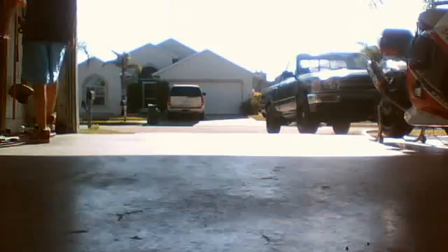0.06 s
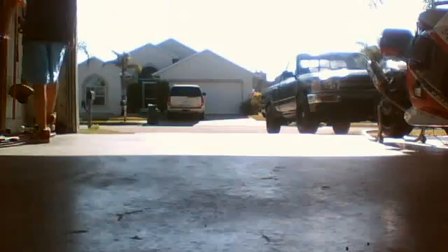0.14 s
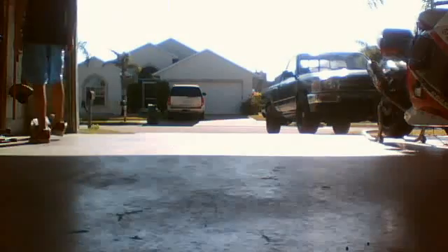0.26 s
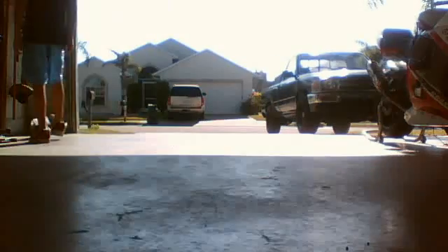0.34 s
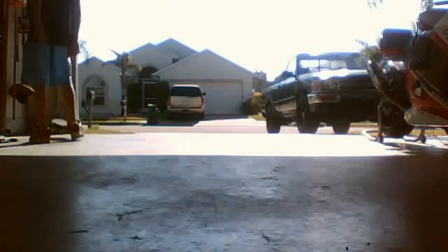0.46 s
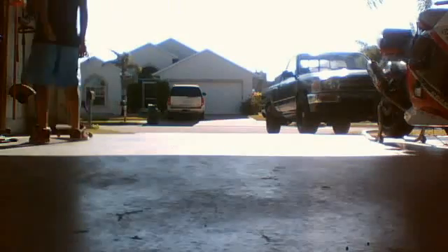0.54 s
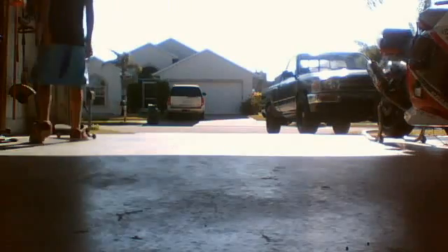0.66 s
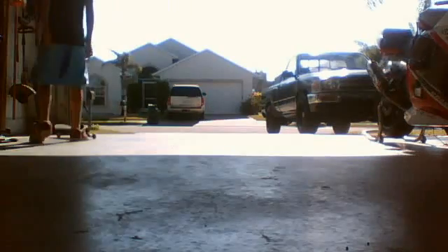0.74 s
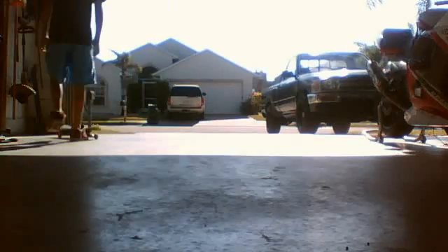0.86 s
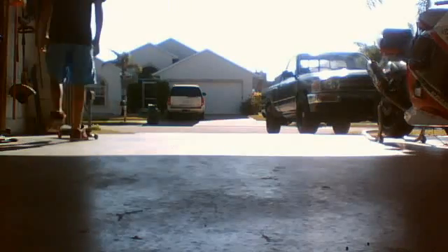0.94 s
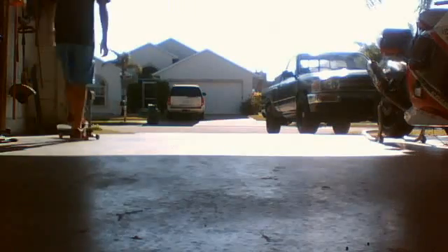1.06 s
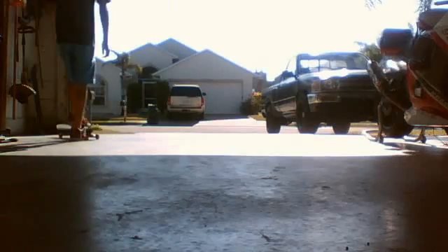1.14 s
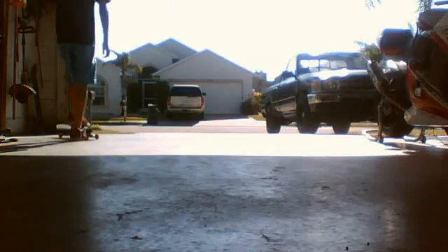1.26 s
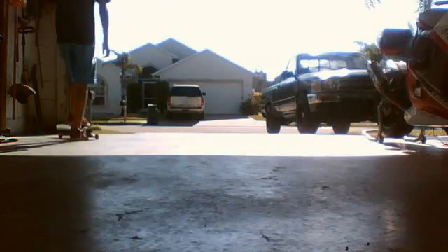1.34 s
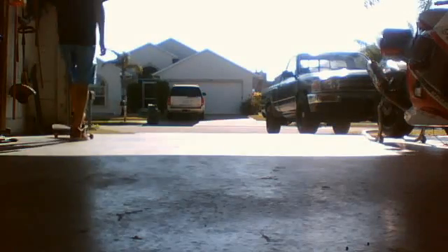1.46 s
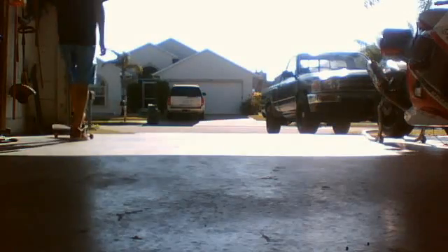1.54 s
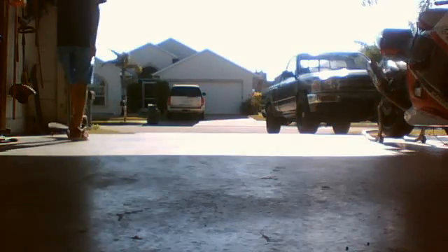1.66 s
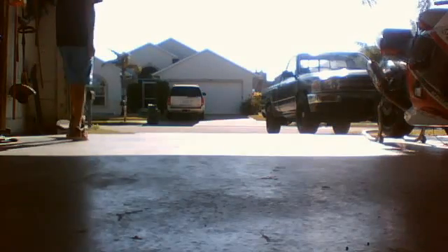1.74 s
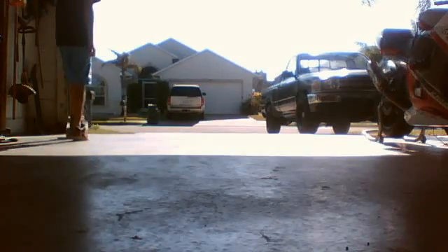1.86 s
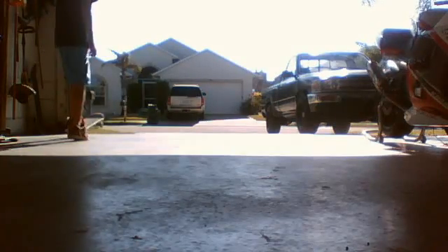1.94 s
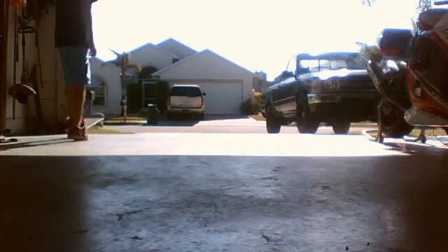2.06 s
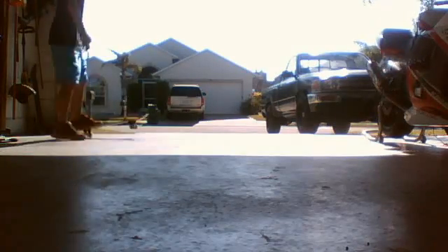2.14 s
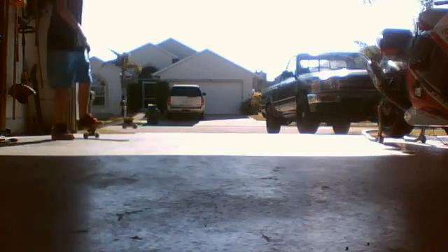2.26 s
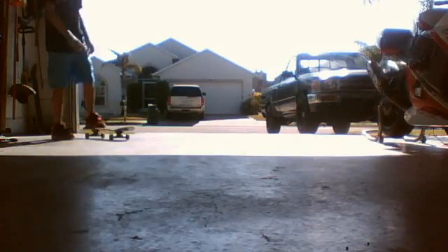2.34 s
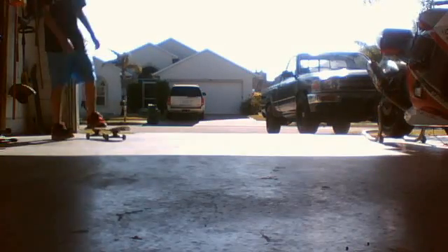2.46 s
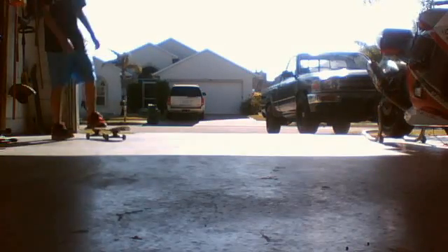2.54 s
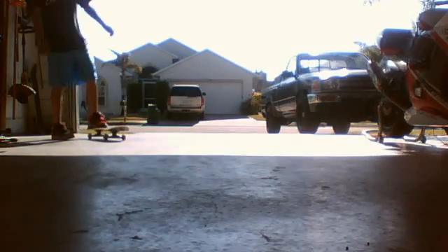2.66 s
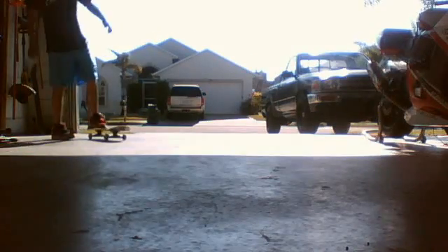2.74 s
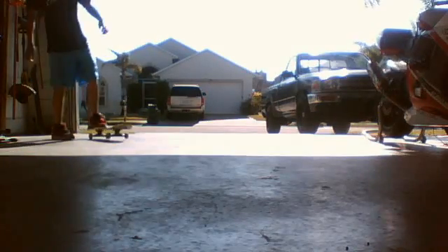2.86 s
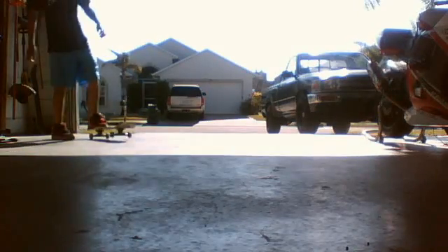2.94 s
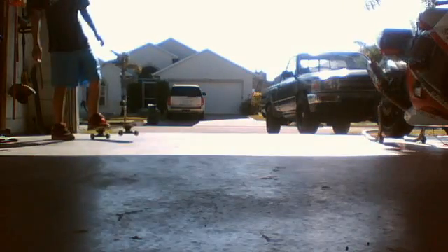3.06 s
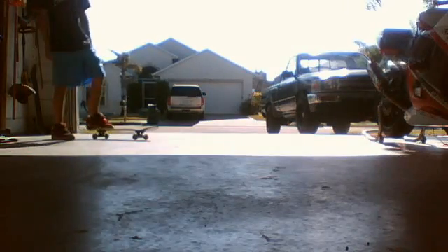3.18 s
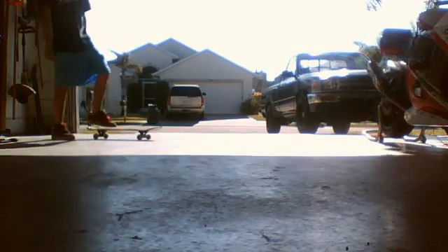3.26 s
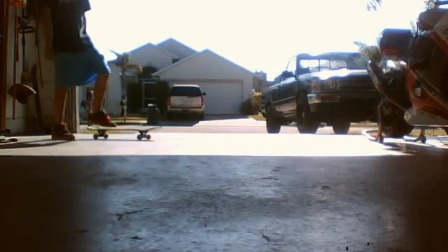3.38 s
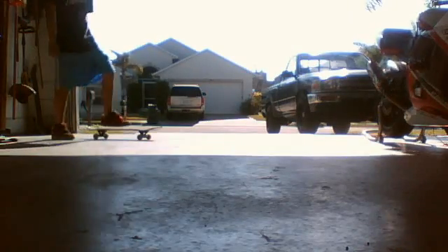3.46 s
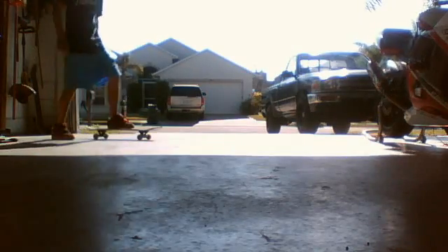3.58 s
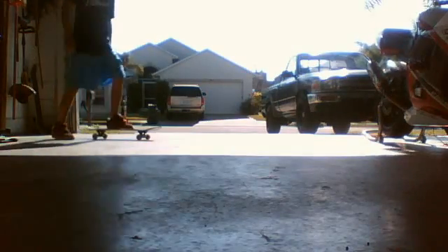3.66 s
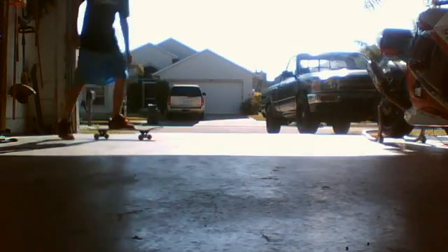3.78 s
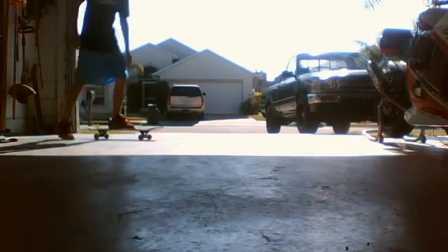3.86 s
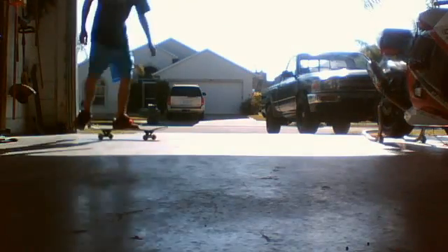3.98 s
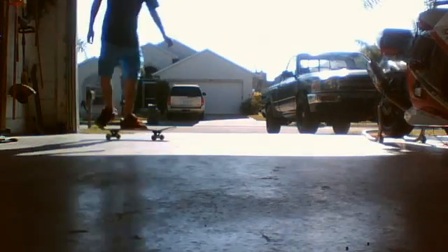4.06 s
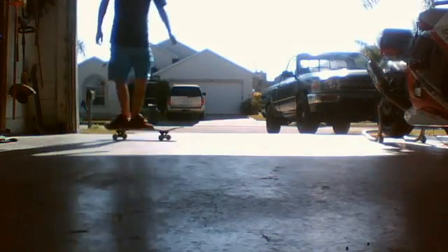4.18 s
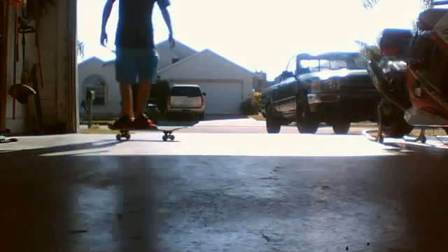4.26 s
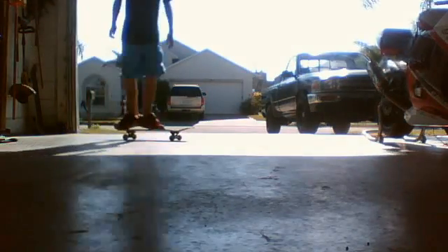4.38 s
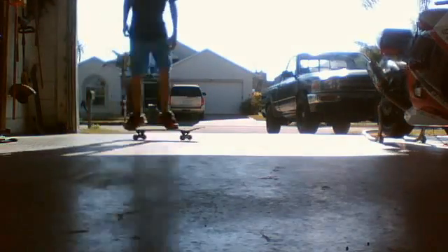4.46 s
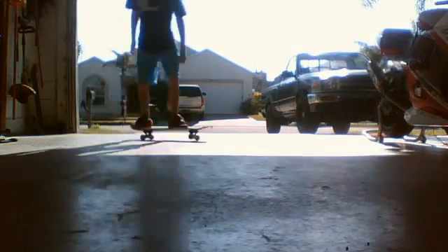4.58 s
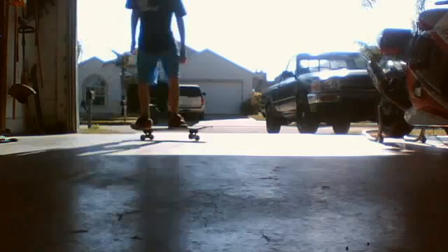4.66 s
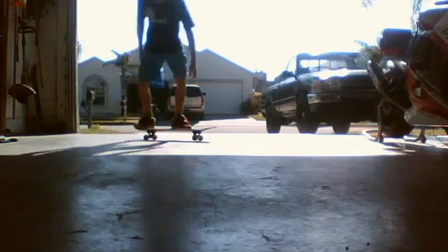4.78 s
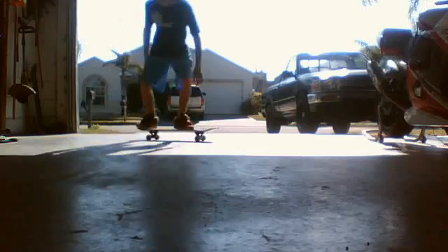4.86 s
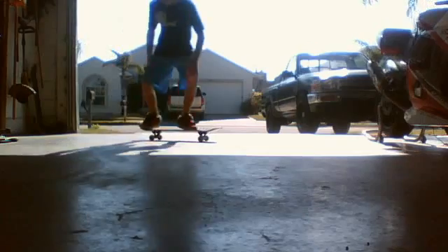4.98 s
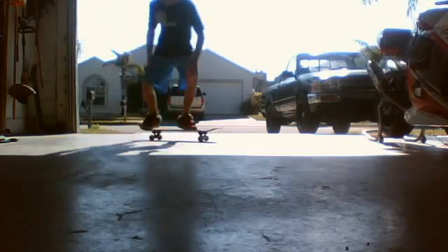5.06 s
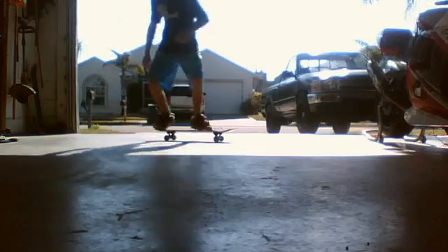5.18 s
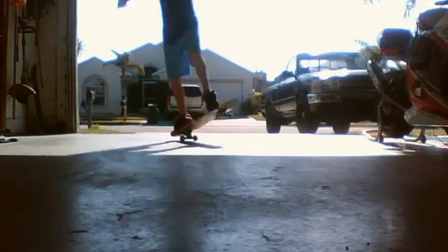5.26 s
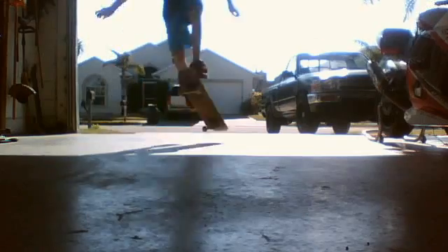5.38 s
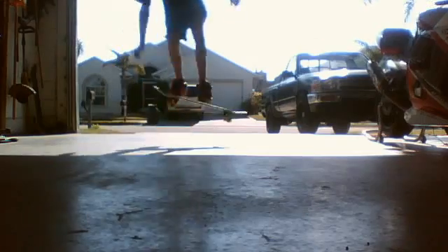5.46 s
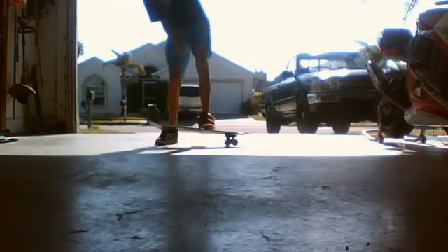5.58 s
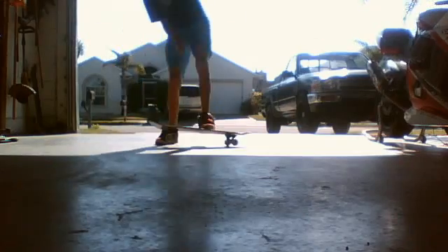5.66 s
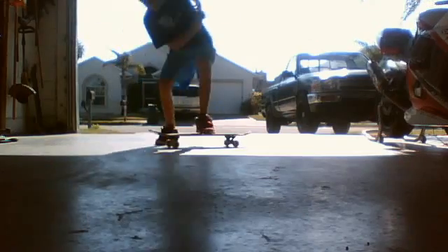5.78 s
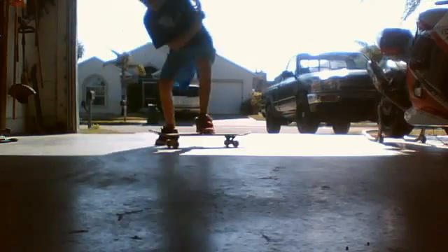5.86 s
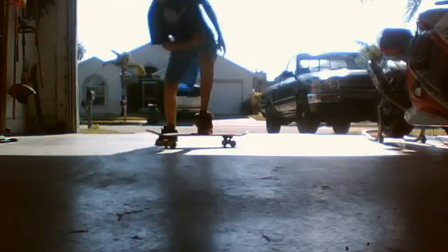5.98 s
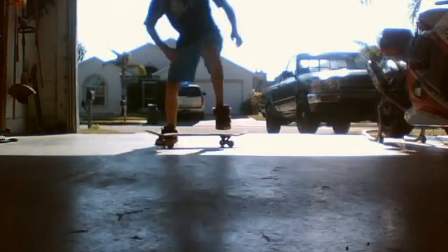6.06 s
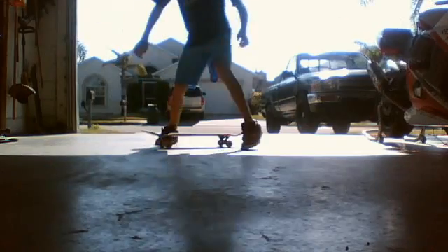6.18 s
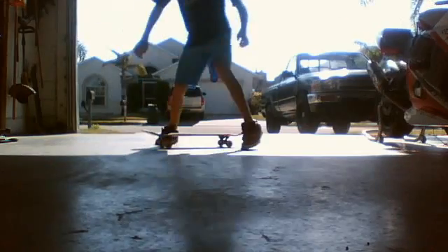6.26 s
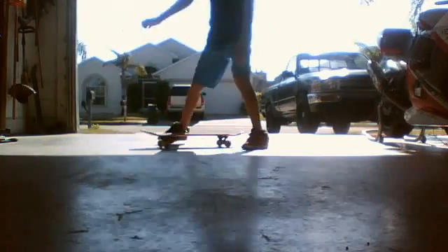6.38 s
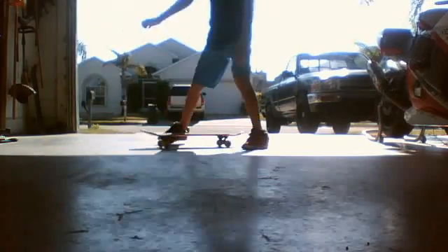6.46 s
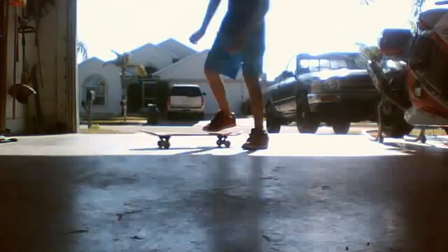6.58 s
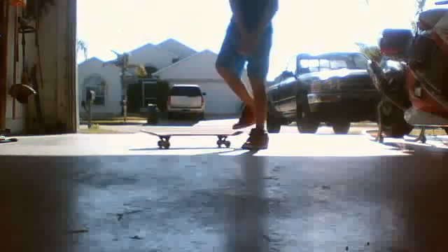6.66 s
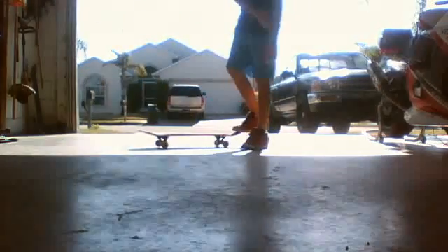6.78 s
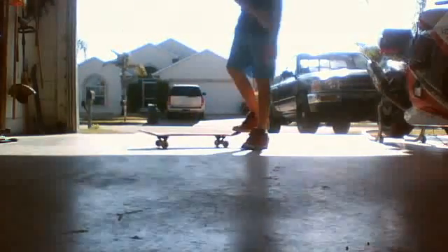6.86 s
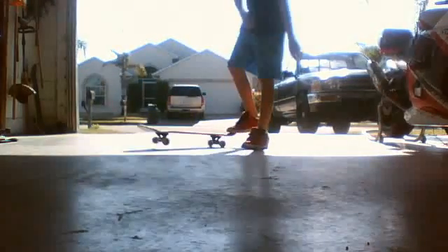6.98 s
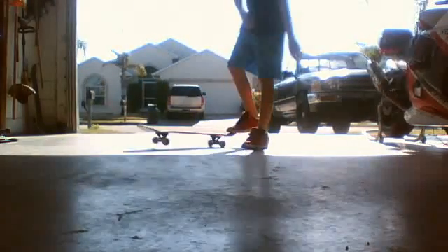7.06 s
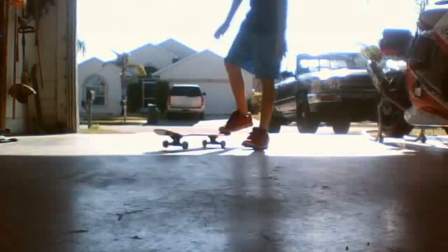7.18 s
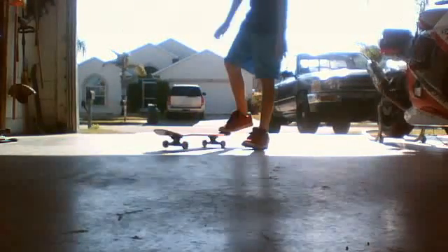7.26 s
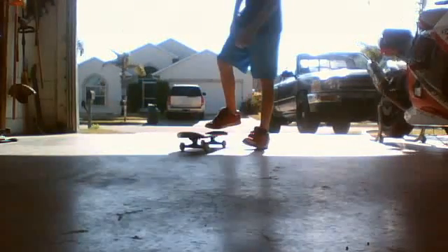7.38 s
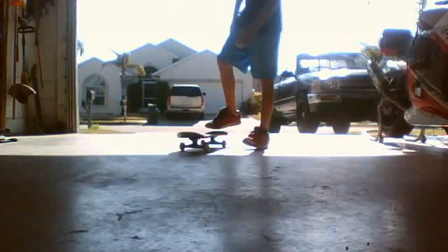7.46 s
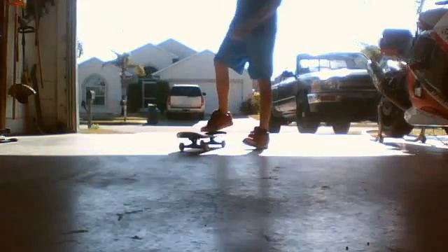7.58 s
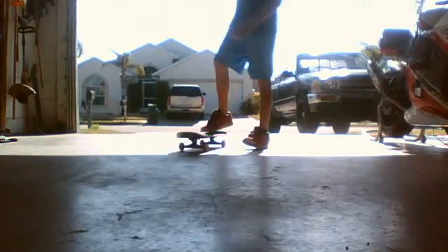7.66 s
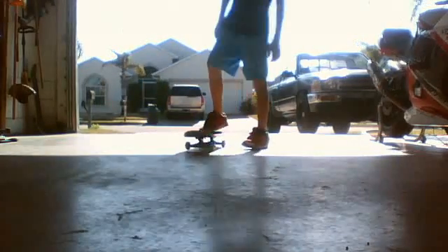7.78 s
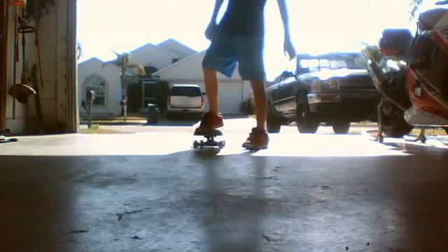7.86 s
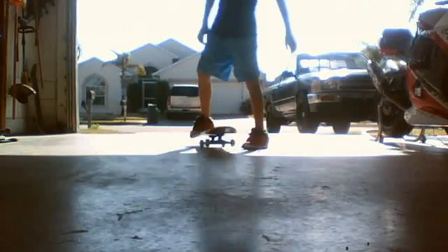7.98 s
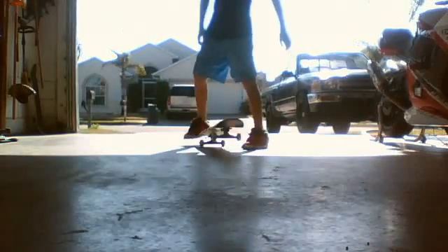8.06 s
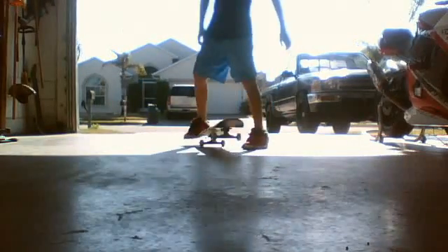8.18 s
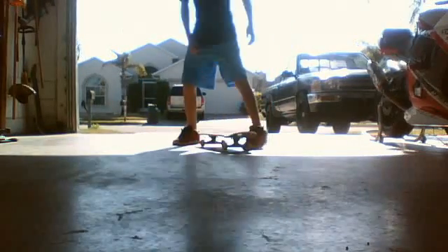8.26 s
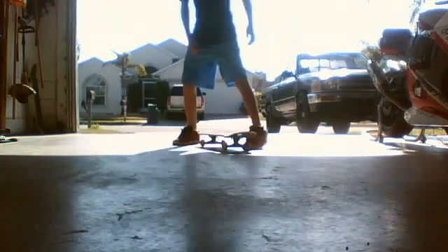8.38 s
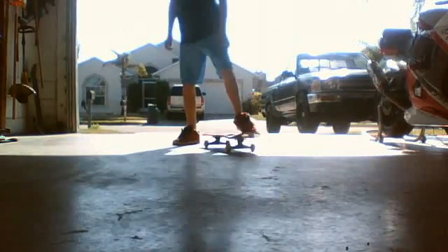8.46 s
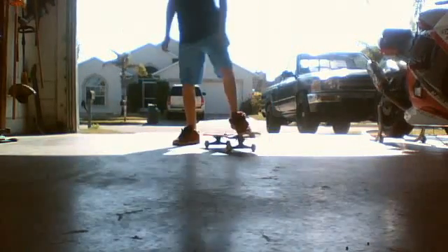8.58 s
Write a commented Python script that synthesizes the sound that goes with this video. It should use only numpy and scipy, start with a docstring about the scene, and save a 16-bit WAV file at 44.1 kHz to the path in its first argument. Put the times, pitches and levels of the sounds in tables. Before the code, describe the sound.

A skateboard is handled on concrete in a bare, echoing garage, heard through a small camera that flattens loud peaks. Faint hiss, low murmur and tiny irregular high ticks run throughout. Knocks and shoe thuds at 0.2 and 0.3 s lead to a loud board drop at 0.45 with a quick rattle of rebounds. From 1 to 2.2 s only faint taps, scuffs and very soft rolling remain. Sharp, ringing wooden slaps hit at 2.4 and 3.2 s, each with short clatter. A light knock comes at 3.6, then foot knocks and scuffs at 4.2-4.6 over low wheel rumble. A crisp pop cracks at 5.3, with a heavy, bassy landing at 5.6 and rattling rebounds. Rolling fades near 6 s; a dull scrape follows at 6.8. Duller slaps land at 7.2, 8.0 and 8.3 s, with shoe thuds near 8.2.

```python
"""A skateboard is dropped, stepped on, popped, landed and kicked about on concrete at the mouth of an open garage.
Each blow cracks the wooden deck with shaped echoes and rings its modes as fading sine waves.
Shoes thud as short tones, soles and metal trucks scrape as bands of noise, and wheels roll as a low rumble.
Tiny high ticks and a faint, steady hiss with a low murmur lie behind; the bare garage echoes blows and steps.
A small camera overloads hard on the loud slaps."""
import sys
import numpy as np
from scipy import signal
from scipy.fft import rfft, irfft
from scipy.io import wavfile

SR = 44100
rng = np.random.default_rng(int(sys.argv[2]) if len(sys.argv) > 2 else 0)


def master_out(mix):
    """Clip the mix to full scale and print it as 16-bit PCM to the path in sys.argv[1]."""
    frames = np.transpose(np.atleast_2d(mix))
    ceiling = np.clip(frames, -1, 1)
    pcm = np.round(ceiling * 32767).astype(np.int16)
    wavfile.write(sys.argv[1], SR, pcm)


N = 380141  # samples in the whole scene
T = np.arange(SR * 4 // 5) / SR  # clock for one short sound and its echo, in seconds


# Ways the deck can ring; the first four ring on when no foot damps them:
# (pitch [Hz], level [dB], time to fade by 60 dB [s])
DECK_MODES = [(721.8, -1, 0.097), (712, -4.5, 0.3), (750.5, -2.5, 0.21), (1852, -15.5, 0.16),
              (343.2, -0.5, 0.37), (469.7, -6.5, 0.23), (600.4, 13.5, 0.046), (681, 0.5, 0.099),
              (804.2, 2.5, 0.24), (1027, -18, 0.57), (1114, -3, 0.18), (1187, -34, 0.082),
              (1470, -20, 0.11), (1630, -7.5, 0.28), (2212, -7, 0.15), (2415, -12.5, 0.15),
              (2960, -10, 0.093)]
# Tone colour of the crack of the wood: (frequency [Hz], level [dB])
WOOD_COLOUR = [(100, -26), (160, -16.5), (250, -1.5), (330, 4), (460, -4), (650, 12), (900, 6.5),
               (1400, 2.5), (2200, -6.5), (3000, -15.5), (4500, -25), (7000, -41), (10000, -64),
               (15000, -66)]


def board(modes_db=-5, bass_hz=380, treble_hz=2700, detuning=0.0071, direct_db=-5, crisp_s=0.0021):
    """Each blow cracks the wooden deck and rings its modes; the longer the contact, the slower the sound swells."""
    out = np.zeros(N)
    hz = bins(size=2048)
    bass = 1 / (1 + (hz / bass_hz) ** 4)  # one in the bass, falling to zero above
    octaves = np.log2(1 + (hz / treble_hz) ** 6) / 6  # octaves above treble_hz, with a soft start
    direct = (T == 0) * gain(direct_db)
    contacts = blows()
    for contact, room in zip(contacts, garage(len(contacts))):
        s, knock_db, ring_db, bass_db, tilt_db, contact_s = contact
        push = T * np.exp(-T / contact_s)
        echoes = room * np.cumsum(push) / push.sum()
        # only a crisp contact sends a distinct click ahead of the echoes
        click = direct * np.exp(-contact_s / crisp_s)
        colour = causal(along(WOOD_COLOUR, hz) + bass_db * bass + tilt_db * octaves)
        crack = echoed(colour, echoes + click)
        # the load on the deck detunes its modes a little from blow to blow
        detune = 1 + detuning * rng.standard_normal(len(DECK_MODES))
        modes = [gain(db) * np.sin(2 * np.pi * f * shift * T) * fade(t60)
                 for (f, db, t60), shift in zip(DECK_MODES, detune)]
        free = echoed(sum(modes[:4]), echoes + direct)
        loaded = echoed(sum(modes[4:]), echoes)
        blow = burst(crack, knock_db) + burst(loaded, knock_db + modes_db) + burst(free, ring_db)
        add(out, s, blow)
    return out


# The board comes down on the concrete and clatters:
# (time [s], knock level [dB], free ring level [dB], bass boost [dB], contact time [s],
#  rebounds [count], time between rebounds [s], loss by the last rebound [dB])
BOARD_SLAPS = [(.445, -6, -17, 9.5, 0.0029, 7, 0.042, 3), (2.433, -5, -5.5, 0, 0.0017, 4, 0.04, 14.5),
               (3.211, -5, 0, -5.5, 0.0013, 2, .056, 21), (5.33, -3, -26.5, 7, 0.00074, 1, 0.053, 10.5),
               (5.603, -0.5, -10.5, 11.5, 0.0034, 3, 0.054, 6),
               (7.215, -4.5, -13.5, -3, 0.0053, 1, .032, 8), (7.966, -8, -13.5, 3, 0.0052, 1, .03, 3.5),
               (8.3, -9, -12.5, -3, 0.0018, 1, 0.041, -2)]
SLAP_TILT_DB = 10  # treble, dB per octave; the other tilts too
# one edge touches just ahead of the slap, lightly and brightly
TOUCH_LEAD_S, TOUCH_DB, TOUCH_TILT_DB = 0.0092, -15, 17.5
# rebounds are duller; they hold their strength at first, then die quickly
REBOUND_CONTACT_S, REBOUND_TILT_DB, SETTLE_POWER = 0.0033, 4, 1.64
LIGHT_END_DB = 3  # the two ends strike in turn, the far one more lightly
# The board rocks and knocks under a foot:
# (time [s], knock level [dB], bass boost [dB], treble tilt [dB per octave], contact time [s])
FOOT_KNOCKS = [(.158, -17.5, -15, -23, 0.012), (.316, -13, -3, 11.5, 0.0058), (1.127, -29, -26, -8, 0.0064),
               (1.323, -32, 6.5, -2, 0.0043), (1.535, -31.5, -12, -14, 0.00053),
               (3.596, -25, 9, 2.5, 0.0019), (4.216, -29, -13, 6, .0023), (4.492, -18.5, 16, 6, 0.011),
               (4.575, -11, 8, 3.5, 0.0029), (4.871, -31.5, 0, 14, 0.0013), (5.307, -19.5, 12, 12, 0.0061),
               (5.538, -9, 20.5, 3, 0.0053), (6.295, -25, 19.5, -10, 0.00036),
               (6.743, -31.5, 2, 14, 0.0028), (8.26, -21.5, -13, 9, 0.0041)]
UNDERFOOT_RING_DB = -10.5  # the foot damps the free ring; relative to the knock


def blows():
    """Lists each contact: (time [s], knock [dB], ring [dB], bass [dB], tilt [dB per octave], contact [s])."""
    rows = []
    for s, db, bass_db, tilt_db, contact_s in FOOT_KNOCKS:
        rows.append((s, db, db + UNDERFOOT_RING_DB, bass_db, tilt_db, contact_s))
    for s, db, ring_db, bass_db, contact_s, count, gap_s, lost_db in BOARD_SLAPS:
        touch_db = db + TOUCH_DB
        rows.append((s - TOUCH_LEAD_S, touch_db, touch_db + UNDERFOOT_RING_DB,
                     bass_db, TOUCH_TILT_DB, contact_s))
        rows.append((s, db, ring_db, bass_db, SLAP_TILT_DB, contact_s))
        count = round(count)
        for k in range(1, count + 1):
            drop_db = lost_db * (k / count) ** SETTLE_POWER + k % 2 * LIGHT_END_DB
            late_s = gap_s * (k + rng.uniform(-.1, .1))  # slightly uneven timing
            rows.append((s + late_s, db - drop_db, ring_db - drop_db,
                         bass_db, REBOUND_TILT_DB, REBOUND_CONTACT_S))
    return rows


# Shoes come down on the deck or the floor: (time [s], level [dB], pitch [Hz])
SHOE_THUDS = [(.227, -12, 468), (0.334, -14.5, 335), (1.979, -40.5, 262), (2.092, -36.5, 252),
              (2.209, -30.5, 597), (4.129, -30, 558), (4.217, -31.5, 190), (4.59, -19.5, 440),
              (5.178, -33, 198), (5.533, -12, 340), (6.223, -35, 484), (8.212, -22, 304),
              (8.213, -23.5, 582)]


def shoes(thud_t60=0.046, slap_t60=0.016, slap_db=-3):
    """Rubber soles give a dull, damped thud, and a slap that fades faster and so sounds broader."""
    out = np.zeros(N)
    for (s, db, hz), room in zip(SHOE_THUDS, garage(len(SHOE_THUDS))):
        tone = np.sin(2 * np.pi * hz * T)
        thud = echoed(tone * fade(thud_t60), room)
        slap = echoed(tone * fade(slap_t60), room)
        add(out, s, burst(burst(thud, 0) + burst(slap, slap_db), db))
    return out


# Soles rub on grip tape, wheels skid:
# (time [s], length [s], level [dB], centre [Hz], width [Hz])
SCUFF_SLIDES = [(1.39, 0.16, -37.5, 1070, 1390), (1.57, 0.082, -27.5, 1160, 1260),
                (2.12, 0.18, -40, 4500, 1240), (2.21, 0.075, -29, 1200, 4540),
                (2.23, 0.045, -33, 3870, 450), (4.208, 0.043, -28.5, 1350, 1490),
                (4.462, 0.069, -26, 1240, 1700), (4.866, 0.0085, -48.5, 5160, 500),
                (5.133, 0.34, -27.5, 504, 900), (6.76, 0.17, -39, 2200, 5060),
                (6.765, 0.13, -23.5, 446, 263)]
# the metal trucks scrape briefly at every slap and knock; level relative to it
TRUCK_S, TRUCK_DB, TRUCK_HZ, TRUCK_WIDTH_HZ = 0.018, -18, 2450, 1440


def scrapes(grit_db=4):
    """Sliding soles, wheels and trucks rasp over grit: a band of uneven noise that swells and dies away."""
    out = np.zeros(N)
    slides = list(SCUFF_SLIDES)
    for s, db, *_ in list(BOARD_SLAPS) + list(FOOT_KNOCKS):
        slides.append((s, TRUCK_S, db + TRUCK_DB, TRUCK_HZ, TRUCK_WIDTH_HZ))
    for (s, length, db, hz, width), room in zip(slides, garage(len(slides))):
        grit = rng.standard_normal(len(T)) * gain(grit_db * rng.standard_normal(len(T)))
        swell = np.sin(np.pi * np.minimum(T / length, 1))
        rasp = band(grit, hz, width) * swell
        add(out, s, burst(echoed(rasp, room), db))
    return out


# The wheels roll on rough concrete: (start [s], length [s], level [dB])
WHEEL_ROLLS = [(0.953, 2.3, -49.5), (2.587, 0.097, -42), (4.173, .93, -42.5), (5.173, 0.4, -31.5),
               (5.835, 0.19, -32.5), (7.346, .12, -35), (7.973, 0.49, -41)]
# Tone colour of the rolling: (frequency [Hz], level [dB])
RUMBLE_COLOUR = [(100, -6), (200, 8.5), (400, 4), (750, 7.5), (1500, -6), (3000, -18.5), (8000, -54.5)]
SPEED_UP_DB_PER_S, COAST_DB_PER_S = 149, 73


def wheels(bumps_db=3.0):
    """A low rumble swells at each push, holds, coasts away, and wavers with the bumps in the concrete."""
    t = np.arange(N) / SR
    knots = np.arange(0, N / SR, 1 / 40)  # a new bump 40 times a second
    bumps = np.interp(t, knots, rng.standard_normal(len(knots)))
    runs = []
    for s, length, db in WHEEL_ROLLS:
        before = np.maximum(s - t, 0)
        after = np.maximum(t - s - length, 0)
        runs.append(db - SPEED_UP_DB_PER_S * before - COAST_DB_PER_S * after)
    return noise(RUMBLE_COLOUR) * gain(np.max(runs, axis=0) + bumps_db * bumps)


TICK_GAP_S, TICK_SCATTER_DB = 0.13, 2.5  # average gap, and most a tick strays from its level


def ticks(tick_db=-37, tick_hz=3200, length_s=0.0053, octave_db=-10, wobble=0.13, count=90):
    """Tiny high ticks at uneven intervals, a few unsteady cycles each, with a weaker tone an octave up."""
    out = np.zeros(N)
    t = np.arange(int(length_s * SR)) / SR
    times = np.cumsum(TICK_GAP_S * (.5 + rng.random(count)))
    sizes = 2 * rng.random(count) - 1
    for s, size in zip(times, sizes):
        phase = 2 * np.pi * tick_hz * t + wobble * np.cumsum(rng.standard_normal(len(t)))
        cycles = np.sin(phase) + gain(octave_db) * np.sin(2 * phase)
        tick = np.sin(np.pi * t / length_s) * cycles
        if s < N / SR:
            add(out, s, gain(tick_db + TICK_SCATTER_DB * size) * tick)
    return signal.sosfilt(signal.butter(8, 7500, fs=SR, output="sos"), out)


# Tone colour of the background: (frequency [Hz], level [dB])
HISS_COLOUR = [(30, -17), (70, -37.5), (130, 8.5), (200, 5), (700, -0.5), (1500, -2.5), (3000, -7.5),
               (6900, -14.5), (8200, -22), (10300, -33), (11500, -65)]
HISS_DB = -46


def hiss():
    """Steady coloured noise: a low murmur under a faint hiss."""
    return gain(HISS_DB) * noise(HISS_COLOUR)


# The garage's echo: (frequency [Hz], time to fade by 60 dB [s])
GARAGE_ECHO = [(150, 0.31), (700, 0.54), (2000, 0.6), (5000, 0.46), (10000, 0.26)]


def garage(count, early_db=0, early_t60=0.21):
    """Random echoes, one per sound: strong reflections off the near walls, then the long ring of the room."""
    hz = bins(len(T))
    edges = np.array(GARAGE_ECHO)[:, 0]
    spectra = rfft(rng.standard_normal((count, len(T))))
    late = 0
    # each row of the table takes its share of the spectrum and fades at its own pace
    for share, (_, t60) in zip(np.eye(len(edges)), GARAGE_ECHO):
        weight = along(np.c_[edges, share], hz)
        late = late + irfft(spectra * weight, len(T)) * fade(t60)
    early = gain(early_db) * fade(early_t60) * irfft(spectra, len(T))
    tails = late + early
    return tails / np.linalg.norm(tails, axis=1, keepdims=True)


def echoed(x, room):
    """A short sound as it arrives through the garage."""
    return signal.fftconvolve(x, room)[:len(T)]


def gain(db):
    """Turns decibels into a multiplier."""
    return 10 ** (np.asarray(db) / 20)


def fade(t60):
    """A decay that loses 60 dB in t60 seconds."""
    return np.exp(-np.log(1000) * T / t60)


def along(points, hz):
    """Reads (frequency [Hz], value) points on a log-frequency axis."""
    f, value = np.transpose(points)
    return np.interp(np.log(hz + 1), np.log(f), value)


def bins(size):
    """The frequencies in the spectrum of a sound with this many samples."""
    return np.arange(size // 2 + 1) * SR / size


def noise(points):
    """Noise of the given colour for the whole scene, with an rms of 1."""
    x = irfft(rfft(rng.standard_normal(N)) * gain(along(points, bins(N))), N)
    return x / x.std()


def causal(db):
    """A click of the given colour with its energy as early as possible (minimum phase)."""
    cepstrum = irfft(np.log(gain(db)))
    half = len(cepstrum) // 2
    # fold the second half onto the first, so that nothing sounds before the start
    cepstrum[1:half] *= 2
    cepstrum[half + 1:] = 0
    return irfft(np.exp(rfft(cepstrum)))


def band(x, hz, width):
    """Keeps a bell-shaped band around one pitch."""
    bell = np.exp(-2 * ((bins(len(x)) - hz) / width) ** 2)
    return irfft(rfft(x) * bell, len(x))


def burst(x, db):
    """Scales a short sound so that its energy, packed into a twentieth of a second, has this level."""
    return x * gain(db) / np.sqrt(np.sum(x ** 2) * 20 / SR)


def add(out, s, x):
    """Mixes x in at time s."""
    start = max(int(s * SR), 0)
    out[start:start + len(x)] += x[:N - start]


def scene():
    """Board, shoes, scrapes and wheels over small ticks and a steady hiss, in one channel."""
    return (board() + shoes() + scrapes() + wheels() + ticks() + hiss())[None]


MIC_ORDER, CLIP_LEVEL, TOP_HZ = 6, .71, 15750  # steepness of the bass cut, overload level, top limit


def record(dry, low_hz=108, soft_hz=11500):
    """The camera drops the bass, flattens every loud peak, then softens and cuts the top."""
    thin = signal.sosfilt(signal.butter(MIC_ORDER, low_hz, "high", fs=SR, output="sos"), dry)
    # clip at twice the sample rate, for fewer false tones
    fine = signal.resample_poly(thin, 2, 1, axis=-1)
    flat = signal.resample_poly(np.clip(fine, -CLIP_LEVEL, CLIP_LEVEL), 1, 2, axis=-1)
    soft = signal.sosfilt(signal.butter(2, soft_hz, fs=SR, output="sos"), flat)
    return signal.sosfiltfilt(signal.ellip(8, .05, 60, TOP_HZ, fs=SR, output="sos"), soft)


dry = scene()
out = record(dry)
master_out(out)
```